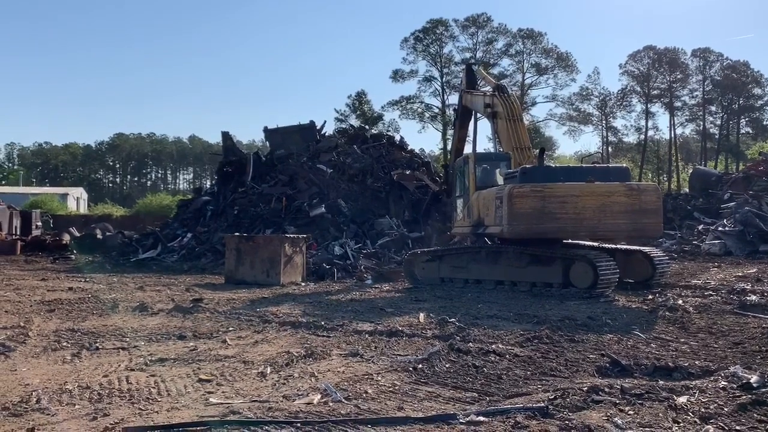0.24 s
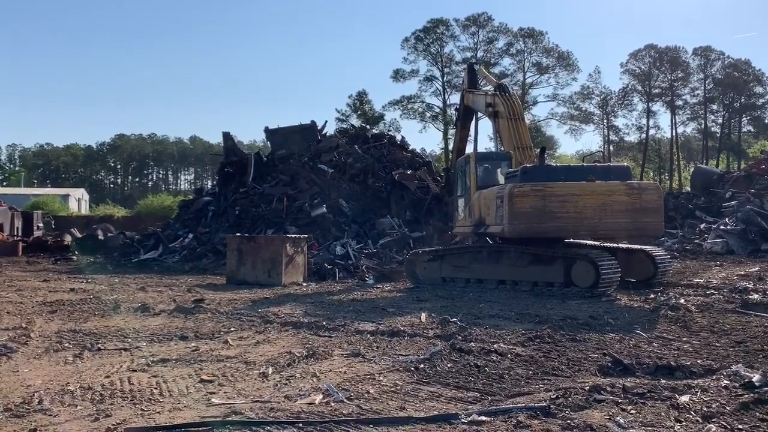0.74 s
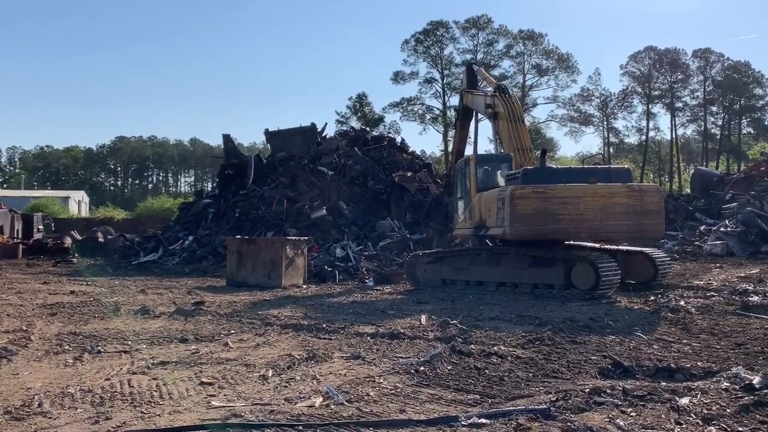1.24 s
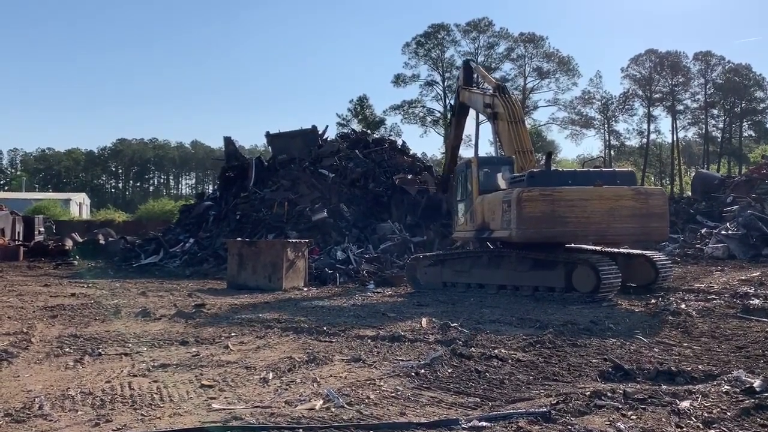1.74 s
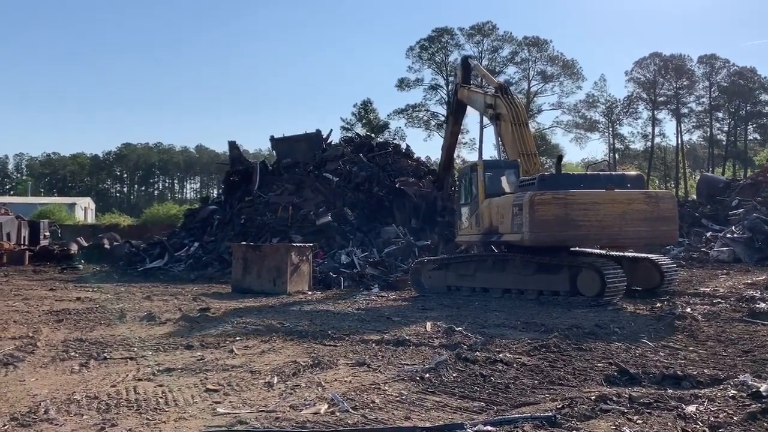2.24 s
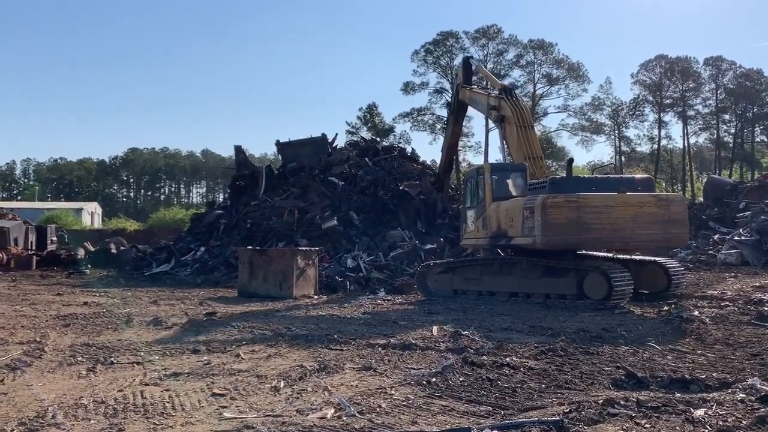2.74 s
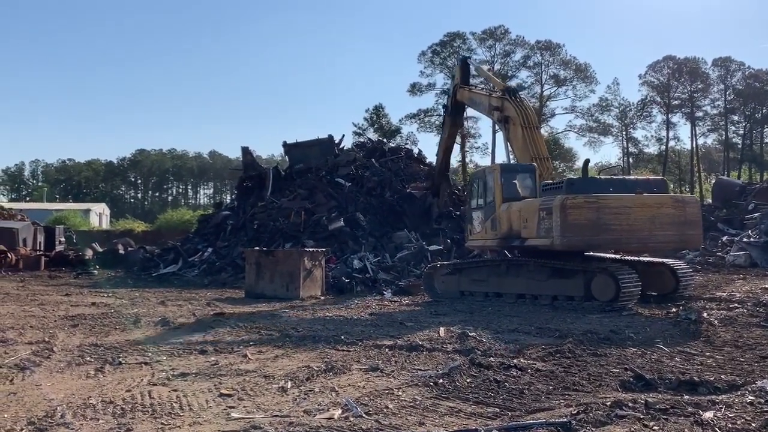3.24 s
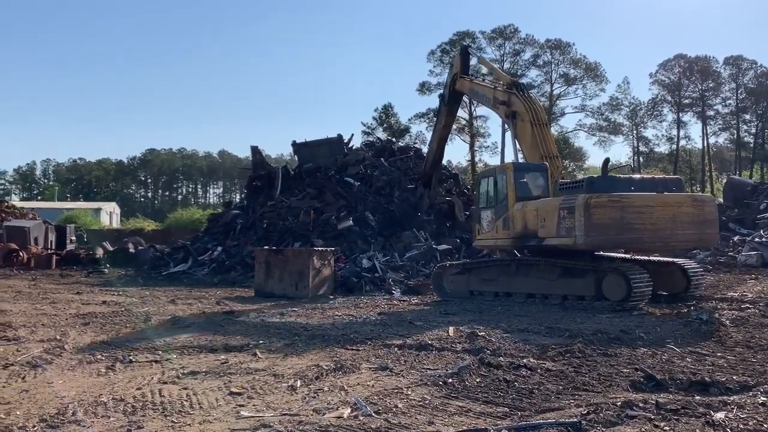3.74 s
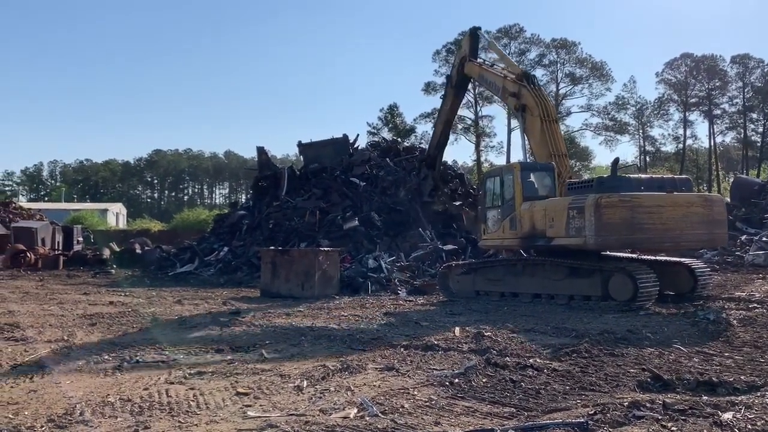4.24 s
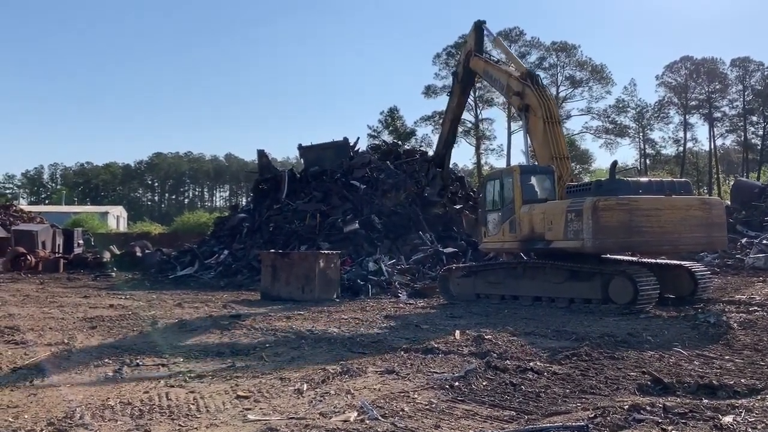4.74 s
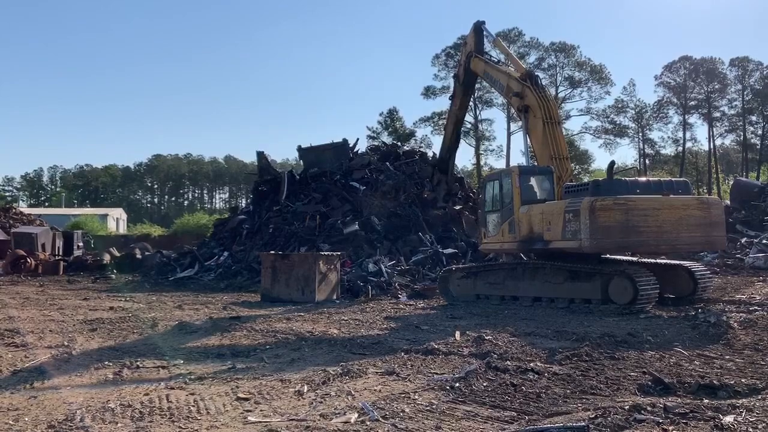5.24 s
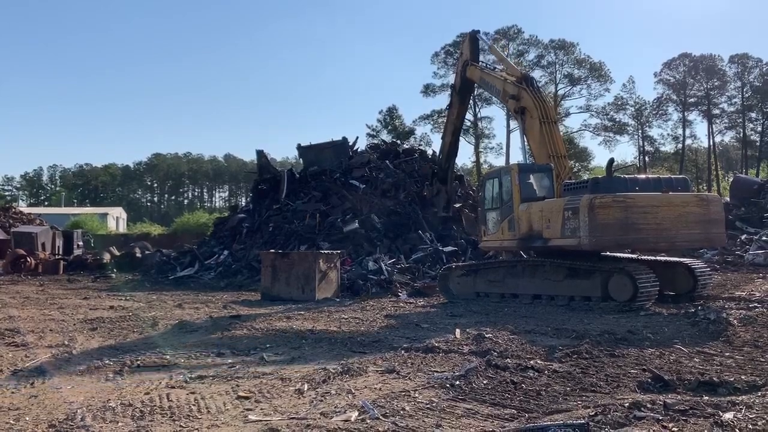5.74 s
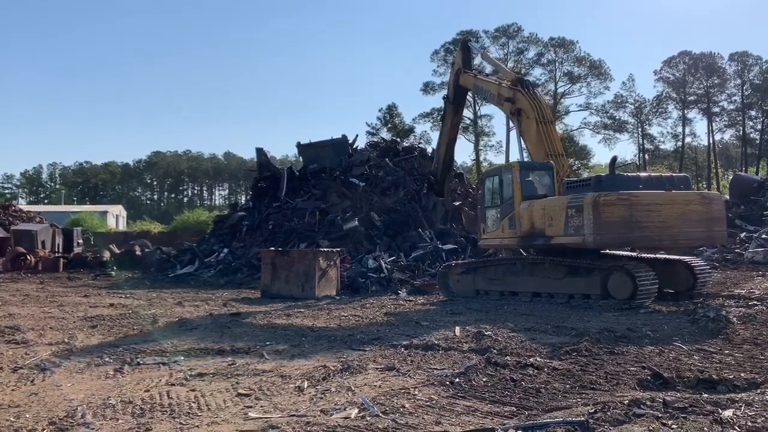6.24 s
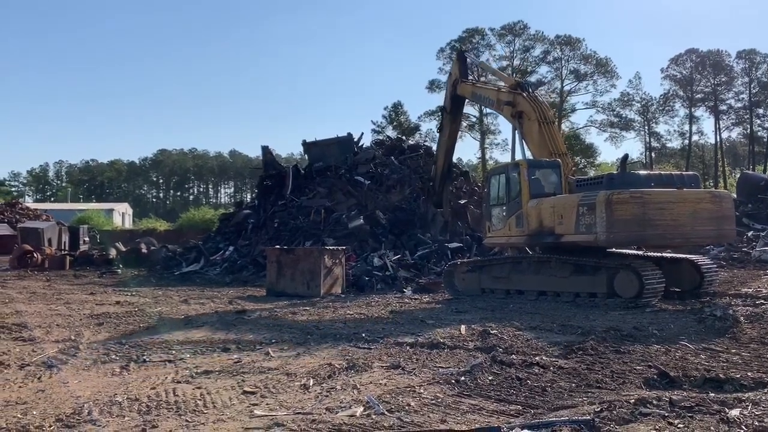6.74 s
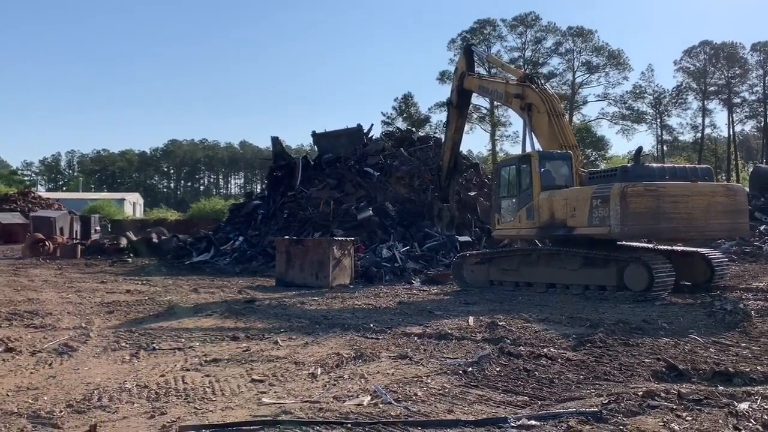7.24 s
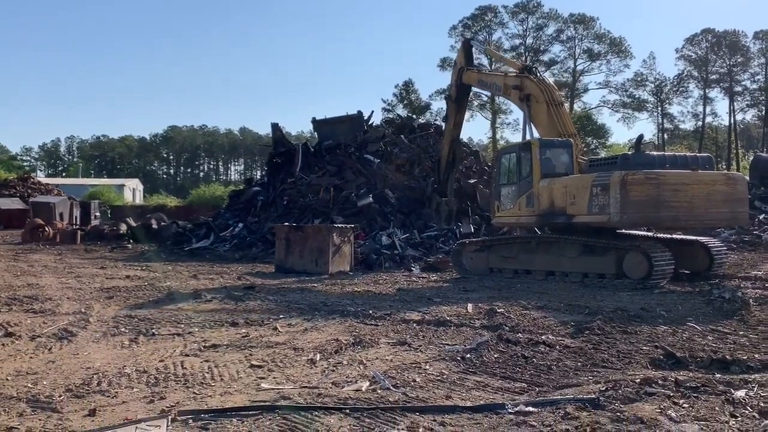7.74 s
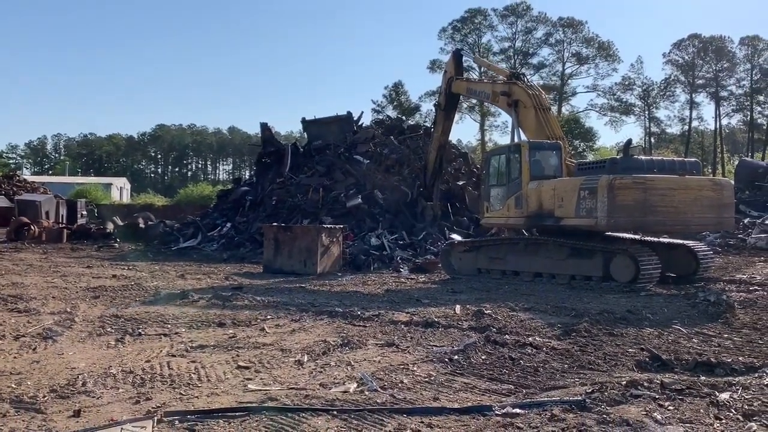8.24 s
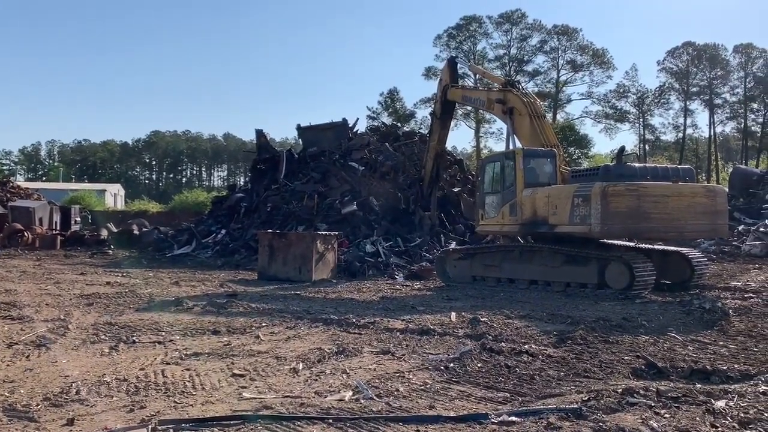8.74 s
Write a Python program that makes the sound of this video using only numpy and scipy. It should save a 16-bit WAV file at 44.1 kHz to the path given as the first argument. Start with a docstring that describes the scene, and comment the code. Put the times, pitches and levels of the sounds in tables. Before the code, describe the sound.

Steel scrap tumbles and crunches as an excavator pulls at a pile outdoors, over the constant low hum and exhaust roar of its diesel engine. The clanking thickens through the first few seconds, then thins to occasional bumps as the engine eases and the hydraulics whine softly. Near the end another pull brings more clattering, snapping and brief screeches of metal. The stereo sound is fairly dry.

```python
"""A diesel drone and the crunch of metal: a tracked excavator rakes a pile of scrap in an open yard.
Periodic firing gives the six-cylinder engine its tone, and turbulence its exhaust roar and fan rush;
a hydraulic pump whines and a turbocharger whistles faintly. Impacts excite the damped modes of steel
pieces, which tumble, clank, knock and snap. Stick-slip friction makes others screech, judder and groan.
The ground and the scrap scatter a short diffuse tail."""
import sys
import numpy as np
from scipy import signal
from scipy.fft import rfft, irfft, next_fast_len
from scipy.io import wavfile
from scipy.ndimage import uniform_filter1d, map_coordinates

SR = 44100
rng = np.random.default_rng(int(sys.argv[2]) if len(sys.argv) > 2 else 0)


def master_out(mix):
    """Clip the mix to full scale and print it as 16-bit PCM to the path in sys.argv[1]."""
    frames = np.transpose(np.atleast_2d(mix))
    ceiling = np.clip(frames, -1, 1)
    pcm = np.round(ceiling * 32767).astype(np.int16)
    wavfile.write(sys.argv[1], SR, pcm)


N = 396018
TIME = np.arange(N) / SR
BAND_LIMIT_HZ = 15870

# Engine speed, sagging and recovering under the governor. Each row: time in seconds, firing rate in Hz.
FIRING_RATE = [(0.0, 101.3), (0.5, 102), (0.68, 99), (1.15, 99.7), (1.6, 97.8), (2.1, 100.2), (2.37, 102.3),
               (2.7, 100.6), (3.2, 98), (3.49, 101.3), (3.79, 101.1), (4.09, 104.6), (4.24, 102.6),
               (4.79, 100.6), (5.09, 103.4), (5.99, 100.8), (6.78, 103), (7.73, 100.1), (7.98, 102.5),
               (8.68, 103.5), (8.98, 102)]
# Strength of the firing tone. Each row: time in seconds, relative level in dB.
FIRING_LEVEL = [(0.0, -15.5), (1.1, -14.5), (2.34, -16), (2.44, -21), (2.99, -14.5), (3.44, -18.5),
                (3.54, -22.5), (4.29, -27), (4.99, -20.5), (5.14, -28), (5.54, -15.5), (5.69, -24),
                (6.04, -15.5), (6.19, -22), (7.08, -17), (7.23, -23), (7.33, -17.5), (8.98, -21)]
# Unsteadiness of that tone. Each row: time in seconds, modulation depth.
WAVER_DEPTH = [(0, 0.077), (3.3, .09), (4.5, 0.21), (7, 0.25), (8.98, 0.13)]
# Harmonics of the firing tone. Each row: multiple of the firing rate, relative level in dB.
WHOLE_ORDERS = [(1, 0.5), (2, -13), (3, -18.5), (4, -33.5)]
# Partials due to unequal cylinder banks. Each row: multiple of the firing rate, relative level in dB.
HALF_ORDERS = [(.5, -29), (1.5, 0), (2.5, -48), (4.5, -20)]
# Engine load: high in the first bite, let go, then building. Each row: time in seconds, load in dB.
ENGINE_LOAD = [(0.0, -17.5), (0.15, -22), (0.75, -19.5), (1.05, -20.5), (1.6, -17.5), (1.9, -18),
               (2.55, -19), (2.9, -21.5), (3.34, -22), (3.44, -32), (4.94, -30), (5.09, -26), (8.73, -23.5),
               (8.98, -26)]
# Exhaust turbulence. Each row: frequency in Hz, relative spectral density in dB.
ROAR_SPECTRUM = [(20, -32), (35, -17), (55, -1.5), (75, 0.5), (125, 3), (190, -1), (270, -4.5), (380, -14),
                 (700, -20.5), (2000, -81)]

# Pulls of the grab. Each row: start and length in seconds, levels of heavy and of light scrap in dB.
GRAB_PULLS = [(-.05, 0.011, -22.5, -26.5), (0.46, 0.59, -32, -36.5), (1.283, 0.15, -29, -34.5),
              (1.524, 0.32, -25, -26), (1.754, 0.35, -23, -25.5), (2.187, 0.47, -28, -27),
              (2.697, 0.41, -21, -24.5), (2.983, 0.55, -24, -21), (3.58, 0.2, -27, -31),
              (3.798, 0.1, -24.5, -22.5), (4.273, 0.059, -23.5, -26.5), (6.607, 0.4, -33, -38),
              (7.15, 0.69, -31.5, -42), (7.441, 0.063, -20.5, -35), (7.562, 0.11, -24, -29.5),
              (7.722, 0.14, -19.5, -21.5), (7.93, 0.036, -37, -26), (8.056, 0.15, -25, -31),
              (8.481, 0.15, -22, -27.5)]
# Heavy scrap. Each row: frequency in Hz, relative gains in dB for the first and for the second bite.
HEAVY_SPECTRA = [(146.7, -31, 14), (350, -6.5, -3.5), (553, 7, 3.5), (840, 3.5, 3), (1090, 5.5, 1.5),
                 (1350, -9, 1), (1400, -1, 2.5), (1740, 1, 0.5), (1880, -13, -5), (2570, -6.5, -11.5),
                 (3280, -11.5, -9.5), (4130, -12, -10), (5800, -22, -22), (12000, -51, -52)]
# Crossfade between those spectra. Each row: time in seconds, share of the second bite.
SECOND_BITE_SHARE = [(5, 0), (6.5, 1)]
# Light scrap. Each row: frequency in Hz, relative gain in dB.
LIGHT_SPECTRUM = [(1000, 12), (2500, 4.5), (4200, -1), (5200, -5), (6600, 0.5), (8500, -5), (11000, 0.5),
                  (14000, -8), (16000, -1.5)]
# Pieces striking the pile. Each row: start in seconds, relative level in dB, pitch in Hz, T60 in seconds.
CLANK_HITS = [(.049, -9, 1520, 0.081), (.186, -6, 1330, .06), (1.082, -9, 1470, 0.11),
              (1.098, -6, 1013, 0.1), (1.382, -10, 1186, 0.18), (1.569, -9, 955, .1),
              (1.678, -5.5, 1250, 0.15), (1.778, -5, 1696, .12), (1.843, -12, 1480, 0.088),
              (1.918, -6, 1240, .17), (2.05, -8, 1684, .1), (2.134, -7, 917, 0.16), (2.344, -6, 900, .1),
              (2.374, -5.5, 2690, 0.12), (2.577, -5.5, 1000, 0.2), (2.592, -7.5, 1820, 0.059),
              (2.75, -8, 1400, .14), (2.85, -7, 2150, 0.24), (2.954, -13, 1920, .1), (3.022, -6, 956, 0.19),
              (3.115, -1, 1200, 0.1), (3.256, -6, 1290, 0.12), (3.268, -2.5, 1140, .1),
              (3.295, -1.5, 1193, 0.18), (3.329, -1, 1115, 0.11), (3.357, -3.5, 1400, 0.072),
              (3.466, -1, 1313, 0.24), (3.495, -1.5, 1690, 0.056), (3.812, -20, 1660, .3),
              (3.877, -5.5, 1203, 0.15), (4.156, -8.5, 1456, 0.27), (4.285, -9.5, 1305, 0.095),
              (4.379, -9, 1098, 0.13), (4.618, -11, 1370, 0.15), (4.792, -11, 1100, 0.096),
              (5.154, -11, 1400, 0.17), (5.311, -10, 1640, 0.069), (5.459, -17, 1502, 0.087),
              (6.322, -22, 877, .13), (6.954, -16, 1022, 0.26), (7.466, -2, 1560, 0.094),
              (7.488, -4, 855, 0.44), (7.524, -7, 1910, 0.06), (7.598, -11, 1176, .2),
              (7.788, -6, 1674, 0.14), (7.82, -3.5, 2000, .1), (7.874, -2, 1400, 0.13),
              (7.895, -8, 950, 0.14), (7.92, -7, 1350, 0.13), (7.965, -9, 2560, .08),
              (8.012, -10, 2497, .09), (8.032, -9, 1100, .1), (8.079, -5.5, 910, 0.058),
              (8.128, -4.5, 1394, 0.23), (8.156, -5.5, 1620, 0.11), (8.172, -4, 1890, 0.11),
              (8.215, -10, 1010, 0.12), (8.481, -8, 1421, 0.24), (8.56, -14, 1250, 0.14),
              (8.609, -3.5, 1203, 0.25), (8.717, -8, 1600, 0.38)]
# Thin pieces snapping. Each row: start in seconds, relative level in dB, pitch in Hz.
SNAP_HITS = [(1.4007, -22, 6460), (2.3716, -8.5, 11300), (3.497, -11.5, 6570), (3.8123, -15.5, 10700),
             (4.158, -20.5, 6940), (4.619, -25, 5450), (4.969, -28, 9400), (5.1542, -27, 6860),
             (5.207, -27, 14500), (6.72, -25, 6840), (8.0036, -13, 10200), (8.152, -15, 7260),
             (8.291, -15.5, 6920), (8.481, -17, 6350)]
# Heavy bumps. Each row: start in seconds, relative level in dB, lowest mode in Hz, T60 in seconds.
KNOCK_HITS = [(1.094, -16, 430, 0.15), (1.106, -17.5, 920, 0.12), (4.543, -15, 630, 0.053),
              (5.145, -5, 655, 0.036), (5.172, -16.5, 475, 0.11), (5.313, -20, 560, .08),
              (5.33, -16, 490, .07), (5.747, -15, 530, .055), (6.417, -15, 454, 0.08),
              (7.468, -13, 637, .07), (7.49, -15, 544, .1), (7.512, -15, 387, 0.13)]
# Modes of a heavy section. Each row: ratio to the lowest mode, relative level in dB, multiple of the T60.
KNOCK_MODES = [(1, -2.5, 1), (1.17, -11, 1.2), (1.56, -14, 1.8), (2.92, -31, 1.8), (3.7, -15.5, 2.2)]
# Steel scraping steel. Each row: start and length in seconds, resonance and width in Hz, level in dB.
SCREECH_STROKES = [(0.496, 0.047, 12640, 110, -25.5), (2.84, 0.054, 2640, 160, -40),
                   (3.16, 0.063, 2620, 130, -34), (4.153, 0.054, 2950, 328, -34),
                   (4.291, 0.25, 1090, 130, -32), (7.47, 0.11, 14210, 200, -41),
                   (7.864, 0.12, 930, 200, -25), (7.954, .035, 2310, 80, -29), (8.101, 0.15, 1410, 80, -31),
                   (8.283, 0.052, 6400, 350, -35.5), (8.552, 0.11, 1420, 80, -26.5)]
# A dragged beam. Each row: time in seconds, pitch in Hz, level in dB.
BEAM_DRAG = [(3.85, 699, -40), (3.882, 715, -19.5), (3.936, 702, -17), (3.976, 702, -22), (4.005, 691, -23),
             (4.05, 677, -25), (4.13, 685, -34.5)]
# Its modes. Each row: multiple of the pitch, relative level in dB.
BEAM_MODES = [(0.936, -9), (1, -5.5), (1.091, -14), (1.469, -23), (2.08, -18), (2.33, -16)]
# A loose sheet juddering against the grab. Each row: start and length in seconds, level in dB.
SHEET_BURSTS = [(0.508, 0.019, -23.5), (0.567, .008, -26), (0.59, 0.015, -22)]
# Its modes. Each row: frequency and width in Hz, relative level in dB.
SHEET_RESONANCES = [(1700, 220, -1), (1970, 180, -1), (2310, 240, 0), (2520, 140, -3), (3480, 260, -2),
                    (3860, 260, -2), (4330, 340, -7.5)]

# Fan and engine housing. Each row: frequency in Hz, relative spectral density in dB.
FAN_SPECTRUM = [(150, -24), (400, 3.5), (700, 1.5), (1000, 0), (1270, -5.5), (1470, -3), (1800, -9),
                (2150, -5.5), (2900, -14.5), (3900, -12.5), (5800, -16.5), (7200, -17), (11000, -21),
                (16000, -23)]
# Pump whine, louder as the boom lifts. Each row: time in seconds, relative level in dB, piston rate in Hz.
PUMP_WHINE = [(0, -35.5, 296.5), (.85, -36, 300), (1.4, -35.5, 297), (3.6, -44, 302.6), (4.15, -41, 298.4),
              (4.5, -35, 305.2), (4.7, -31.5, 299.3), (4.92, -38.5, 302.5), (5.3, -35, 298.5),
              (5.6, -39.5, 303), (5.9, -33, 300.5), (6.1, -37.5, 297.7), (6.5, -31, 297),
              (6.85, -38, 301.5), (7.2, -32.5, 295.6), (7.75, -31.5, 298), (8.2, -35, 300.7),
              (8.98, -35, 300.7)]
# Its harmonics. Each row: multiple of the piston rate, relative level in dB.
PUMP_HARMONICS = [(1, -2.5), (2, 2)]
# Turbo whistle. Each row: time in seconds, frequency in Hz, level in dB.
TURBO_WHISTLE = [(0, 10000, -68), (.75, 10200, -56), (1.2, 11600, -48), (2.0, 10200, -66),
                 (4.1, 10100, -64), (4.7, 10900, -62), (5.05, 11300, -52), (5.35, 10100, -55),
                 (5.8, 10120, -51), (6.2, 10500, -55), (6.7, 10780, -50), (7.1, 10540, -55.5),
                 (7.55, 10800, -58), (8.98, 10350, -62)]

# Scattering by the yard. Each row: frequency in Hz, diffuse share of the power.
DIFFUSE_SHARE = [(100, .02), (400, .04), (1000, .14), (1500, .33), (2600, .27), (4000, .42), (5300, .6),
                 (6800, .25), (8500, .15), (15000, .2)]
# Lead of left over right. Each row: frequency in Hz, phases in radians for the machine and for the pile.
PHASE_LEAD = [(0, 0, 0), (500, -.1, .05), (1400, .1, .55), (1750, 2, 2.2), (2050, -.8, -.3),
              (2400, -1.3, 0), (3300, .3, 1.3), (4600, .2, 2.3), (5400, -2.4, 1.8), (6200, -1.3, -.1),
              (7400, -1.6, -1.5), (8500, -3.1, -3.1), (11000, -6.3, -6.3), (13400, -9.4, -9.4),
              (15600, -12.6, -12.6)]
# Stereo balance. Each row: frequency in Hz, left minus right level in dB.
BALANCE = [(700, 0), (1400, 2), (2000, 0), (2700, -2), (4000, -1.7), (5300, -3.5), (6800, 0), (15000, 0)]


def exhaust_tone(firings, whole_db=-1.5, upper_waver=2.35):
    """Periodic firing radiates a harmonic series; unequal cylinder banks add half orders under load."""
    tone = gain_of(curve(FIRING_LEVEL) + whole_db)
    bank_beat = under_load(-28.5, db_per_db=1) * gain_of(drift(1.3))
    partials = [(order, gain_of(db) * tone) for order, db in WHOLE_ORDERS]
    partials += [(order, gain_of(db) * bank_beat) for order, db in HALF_ORDERS]
    out = np.zeros(N)
    for order, gain in partials:
        depth = curve(WAVER_DEPTH) * (1 if order < 2 else upper_waver)
        angle = 2 * np.pi * (order * firings + rng.random())
        wave = (1 + depth * drift(9.6)) * np.cos(angle) + depth * drift(10.3) * np.sin(angle)
        out += gain * wave / np.sqrt(1 + 2 * depth ** 2)  # wavering adds no power
    return np.sqrt(2) * out


def exhaust_roar(firings, level_db=-27, pulsing=0.36):
    """Turbulent gas radiates broadband noise, amplitude-modulated at the firing rate."""
    puffs = (1 + pulsing * np.cos(2 * np.pi * firings)) * rng.standard_normal(N)
    return under_load(level_db, db_per_db=0.5) * coloured(puffs, ROAR_SPECTRUM)


def raked_pile():
    """Dense impacts merge into a texture: heavy sections crunch, wire and thin sheet rattle."""
    crunches = tumble(295.6, 6000, per_s=560, t60=0.14, uneven_db=3.5, clump_db=2, crack=1.2)
    ticks = tumble(2179, 14000, per_s=900, t60=0.18, uneven_db=0, clump_db=4, crack=0.77)
    first, second = (coloured(crunches, HEAVY_SPECTRA, column) for column in (1, 2))
    heavy = first + (second - first) * curve(SECOND_BITE_SHARE)
    heavy_gain, light_gain = raking()
    return heavy * heavy_gain + coloured(ticks, LIGHT_SPECTRUM) * light_gain


def raking(rise_share=0.39, settle_db_per_s=41):
    """Incoherent sources add in power: pulls build, hold and settle over a steady trickle of pieces."""
    power = gain_of([[-35], [-46]]) ** 2  # the trickle of heavy and of light scrap
    for start, length, heavy_db, light_db in GRAB_PULLS:
        t = TIME - start
        rise = np.clip(t / (rise_share * length), 0, 1)
        settle = gain_of(-settle_db_per_s * np.maximum(t - length, 0))
        power = power + (gain_of([[heavy_db], [light_db]]) * rise * settle) ** 2
    return np.sqrt(power)


def tumble(low_hz, high_hz, per_s, t60, uneven_db, clump_db, crack, shift=.05, count=180):
    """Collisions form a Poisson process whose rate drifts, so the pieces ring in clumps."""
    struck = np.flatnonzero(rng.random(N) < per_s / SR * gain_of(clump_db * drift(25)))
    hardness = rng.exponential(1, N)[struck]
    force = rng.choice([-1, 1], N)[struck] * gain_of(uneven_db * np.minimum(hardness, 3))
    which = rng.integers(0, count, N)[struck]
    out = np.zeros(N)
    for k, hz in enumerate(np.geomspace(low_hz, high_hz, count)):
        ring = steel_ring(hz, .5, t60, crack) * np.sqrt(hz)  # equal power per Hz
        for at, size in zip(struck[which == k], force[which == k]):
            add(out, at / SR, size * ring)
    pace = 1 + shift * drift(1.2)  # the pieces shift, so their rings slowly change pitch
    return map_coordinates(out, [np.cumsum(pace)], order=3, mode="wrap")


def steel_ring(hz, octaves, t60, crack, rolloff=0.51, count=18):
    """An impact on odd-shaped steel gives a broad crack and damped inharmonic modes scattered about hz."""
    t = np.arange(round(np.clip(t60, .01, .3) * SR)) / SR
    mode_hz = hz * 2 ** (octaves * rng.standard_normal((count, 1)))
    life, phase = rng.random((2, count, 1))
    decay = np.log(1000) * t / t60
    strength = (mode_hz < BAND_LIMIT_HZ) * np.minimum(hz / mode_hz, 1) ** rolloff
    modes = strength * np.sin(2 * np.pi * (mode_hz * t + phase)) * np.exp(-decay / (.5 + life / 2))
    grit = band_noise(hz / 2, min(hz * 1.27, BAND_LIMIT_HZ), len(t))
    return evened(evened(modes.sum(0)) + crack * evened(grit * np.exp(-decay)))


def impacts(rows, octaves, crack, bounce_s, bounce, level_db, thud, rise_s, rebounds=3):
    """A struck piece thuds and vibrates freely; weaker rebounds against its neighbours excite it again."""
    out = np.zeros(N)
    attack = 1 - np.exp(-np.arange(SR // 2) / SR / rise_s)  # rounded as the loose pile yields
    for start, db, hz, t60 in rows:
        ring = steel_ring(hz, octaves, t60, crack)
        hit = np.zeros(SR // 2)
        add(hit, 0, ring + thud * steel_ring(hz / 2, octaves / 2, t60, crack))
        for late in rng.random(rebounds):
            add(hit, late * bounce_s, bounce * (1 - late / 2) * rng.choice([-1, 1]) * ring)
        nominal_peak = 3 * np.sqrt(np.mean(hit[:SR // 50] ** 2))
        add(out, start, gain_of(db + level_db) * attack * hit / nominal_peak)
    return out


def knocks(crack=0.2, crack_s=0.0028, rise_s=0.0014, hard_db=-5, brighten=0.47):
    """Heavy sections ring in damped modes; the harder the blow, the stronger the upper ones."""
    out, t = np.zeros(N), np.arange(SR // 4) / SR
    for start, db, hz, t60 in KNOCK_HITS:
        ring = np.zeros(len(t))
        for ratio, mode_db, life in KNOCK_MODES:
            gain = gain_of(mode_db + brighten * (db - hard_db) * np.log2(ratio))
            decay = np.exp(-np.log(1000) * t / (life * t60))
            ring += gain * np.sin(2 * np.pi * (ratio * hz * t + rng.random())) * decay
        contact = crack * evened(band_noise(hz / 2, 4 * hz, len(t))) * np.exp(-t / crack_s)
        add(out, start, gain_of(db) * (1 - np.exp(-t / rise_s)) * (ring + contact))
    return out


def screeches(grip=0.32):
    """Irregular stick-slip friction drives one resonance of a sliding piece."""
    out, size = np.zeros(N), SR // 2
    for start, length, hz, width, db in SCREECH_STROKES:
        slips = rng.standard_normal(size)
        slips *= np.exp(grip * evened(uniform_filter1d(rng.standard_normal(size), size=300)))
        progress = np.minimum(np.arange(size) / SR / length, 1)
        stroke = np.sqrt(progress) * (1 - progress)
        ring = filtered(slips, lambda f: 1 / (1 + 1j * (f - hz) / width) ** 2) * stroke
        add(out, start, gain_of(db) * ring / np.sqrt(np.sum(ring ** 2) / (length * SR)))
    return out


def beam_groan(wander=0.012, slips_hz=47, slip_jitter=.15, slip_ring_s=0.011, uneven_db=1.5):
    """Stick-slip, a relaxation oscillation, pulses a beam's modes; they sink as the contact moves."""
    hz = curve(BEAM_DRAG)
    sliding = (TIME > BEAM_DRAG[0][0]) & (TIME < BEAM_DRAG[-1][0])
    since_slip = cycles(slips_hz * (1 + slip_jitter * drift(30))) % 1 / slips_hz
    judder = uniform_filter1d(np.exp(-since_slip / slip_ring_s), size=90)
    ring = np.zeros(N)
    for ratio, db in BEAM_MODES:
        gain = gain_of(db + uneven_db * drift(45))
        ring += gain * np.sin(2 * np.pi * cycles(ratio * hz * (1 + wander * drift(58.3))))
    return sliding * gain_of(curve(BEAM_DRAG, 2)) * evened(judder * ring)


def sheet_judder(slips_per_s=1500, release_s=0.013, linger_db=-16, linger_s=0.17):
    """Bursts of random slips force a loose sheet's resonances, which linger faintly afterwards."""
    power = np.zeros(N)
    for start, length, db in SHEET_BURSTS:
        after = np.maximum(TIME - start - length, 0)
        fade = np.exp(-after / release_s) + gain_of(linger_db) * np.exp(-after / linger_s)
        power += (TIME > start) * (gain_of(db) * fade) ** 2
    slips = (rng.random(N) < slips_per_s / SR) * rng.choice([-1, 1], N)
    ring = filtered(slips, lambda f: sum(gain_of(db) / (1 + 2j * (f - hz) / width) ** 2
                                         for hz, width, db in SHEET_RESONANCES))
    return np.sqrt(power) * evened(ring)


def fan_rush(level_db=-34.5):
    """Turbulent air from the fan and engine housing gives broadband noise that grows with load."""
    gain = under_load(level_db, db_per_db=1.08) * gain_of(drift(18))
    return gain * coloured(rng.standard_normal(N), FAN_SPECTRUM)


def pump_whine(firings, rough=0.3, swell_db=2.4, gear_order=6, gear_db=-4):
    """Close frequencies beat: the pistons' second harmonic lies near the tone of a gear on the crank."""
    strokes = cycles(curve(PUMP_WHINE, 2))
    partials = [(order * strokes, db) for order, db in PUMP_HARMONICS]
    whine = np.zeros(N)
    for phase, db in partials + [(gear_order * firings, gear_db)]:
        angle = 2 * np.pi * phase
        wave = (1 + rough * drift(30)) * np.cos(angle) + rough * drift(46) * np.sin(angle)
        whine += gain_of(db) * wave
    return gain_of(curve(PUMP_WHINE) + swell_db * drift(6)) * whine


def turbo_whistle(jitter_hz=120, flutter=.9):
    """The pitch follows the rotor's speed; random modulation broadens the tone into a fuzzy band."""
    tone = np.sin(2 * np.pi * cycles(curve(TURBO_WHISTLE) + jitter_hz * drift(49.5)))
    return gain_of(curve(TURBO_WHISTLE, 2)) * tone * evened(1 + flutter * drift(70))


def yard_scatter(x, t60=0.068, count=4):
    """Diffuse reflection from ground and scrap adds a short tail that changes as the pieces shift."""
    t = np.arange(SR // 4) / SR
    tails = rng.standard_normal((count, len(t))) * np.exp(-np.log(1000) * t / t60)
    weights = np.array([drift(1.75) for tail in tails])
    weights /= np.linalg.norm(weights, axis=0)
    return sum(signal.oaconvolve(x * weight, tail / np.linalg.norm(tail))[:N]
               for weight, tail in zip(weights, tails))


def stereo_field(direct, diffuse, phase_column):
    """Direct sound arrives left and right with a phase difference; each side has its own diffuse sound."""
    size = next_fast_len(N + 4096, True)
    hz = np.fft.rfftfreq(size, 1 / SR)
    side, share = np.array([[1], [-1]]), at_hz(DIFFUSE_SHARE, hz)
    lead = np.exp(.5j * side * at_hz(PHASE_LEAD, hz, phase_column))
    both = rfft(direct, size) * np.sqrt(1 - share) * lead + rfft(np.array(diffuse), size) * np.sqrt(share)
    return irfft(both * gain_of(side * at_hz(BALANCE, hz) / 2), size)[:, :N]


def under_load(level_db, db_per_db, usual_load_db=-25.5):
    """Power-law growth with engine load; level_db holds at the usual load."""
    return gain_of(level_db + db_per_db * (curve(ENGINE_LOAD) - usual_load_db))


def gain_of(db):
    """Decibels to amplitude."""
    return 10 ** (np.asarray(db) / 20)


def evened(x):
    """Normalisation to rms 1."""
    return x / np.sqrt(np.mean(x ** 2) + 1e-20)


def cycles(hz):
    """Phase in cycles is the time integral of frequency."""
    return np.cumsum(hz) / SR


def curve(rows, column=1):
    """Linear interpolation of a time table at every sample."""
    rows = np.array(rows)
    return np.interp(TIME, rows[:, 0], rows[:, column])


def at_hz(rows, hz, column=1):
    """Interpolation of a frequency table on a log axis."""
    rows = np.array(rows)
    return np.interp(np.log(hz + 1), np.log(rows[:, 0] + 1), rows[:, column])


def filtered(x, response):
    """Filtering multiplies the spectrum by a frequency response."""
    size = next_fast_len(len(x) + 4096, True)
    return irfft(rfft(x, size) * response(np.fft.rfftfreq(size, 1 / SR)), size)[:len(x)]


def coloured(x, spectrum, column=1):
    """Spectral shaping by a table in dB, at rms 1."""
    return evened(filtered(x, lambda hz: gain_of(at_hz(spectrum, hz, column))))


def band_noise(low_hz, high_hz, size):
    """White noise through a gentle band-pass."""
    band = signal.butter(1, [low_hz, high_hz], "bandpass", fs=SR)
    return signal.lfilter(*band, rng.standard_normal(size))


def drift(rate_hz):
    """Low-pass noise of rms 1, fluctuating up to about the given rate."""
    hz = np.fft.rfftfreq(4096, 256 / SR)
    slow = irfft(rfft(rng.standard_normal(4096)) / (1 + (hz / rate_hz) ** 4))
    return evened(np.interp(np.arange(N) / 256, np.arange(4096), slow))


def add(mix, start, sound):
    """Superposes a sound on the mix at a start in seconds."""
    part = mix[max(round(start * SR), 0):][:len(sound)]
    part += sound[:len(part)]


def scene():
    """Superposition of machine and pile, heard from different directions."""
    firings = cycles(curve(FIRING_RATE))
    machine = exhaust_tone(firings) + exhaust_roar(firings) + fan_rush()
    machine += pump_whine(firings) + turbo_whistle()
    machine_diffuse = [fan_rush(level_db=-38) + exhaust_roar(firings, level_db=-22) for side in "LR"]
    clanks = impacts(CLANK_HITS, octaves=.55, crack=0.9, bounce_s=.022, bounce=0.4,
                     level_db=-6, thud=0.67, rise_s=0.0011)
    thin_pieces = [(*row, 0.096) for row in SNAP_HITS]  # one T60 in seconds for all
    snaps = impacts(thin_pieces, octaves=0.18, crack=2.6, bounce_s=0.032, bounce=0.18,
                    level_db=1, thud=0.29, rise_s=0.0014)
    scrap = raked_pile() + clanks + knocks() + snaps + screeches() + sheet_judder() + beam_groan()
    scrap_diffuse = [yard_scatter(scrap) for side in "LR"]
    return (stereo_field(machine, machine_diffuse, phase_column=1)
            + stereo_field(scrap, scrap_diffuse, phase_column=2))


def record(dry):
    """A linear-phase low-pass filter removes the highest treble."""
    low_pass = signal.firwin(1023, BAND_LIMIT_HZ, window=("kaiser", 9), fs=SR)
    return signal.oaconvolve(dry, low_pass[None], "same")


dry = scene()
out = record(dry)
master_out(out)
```